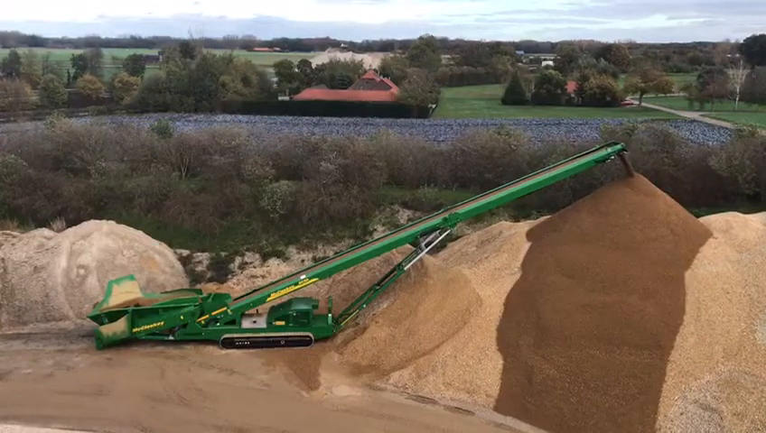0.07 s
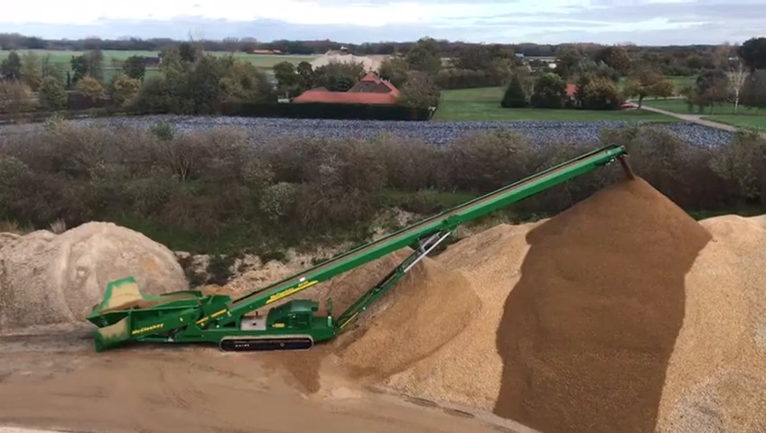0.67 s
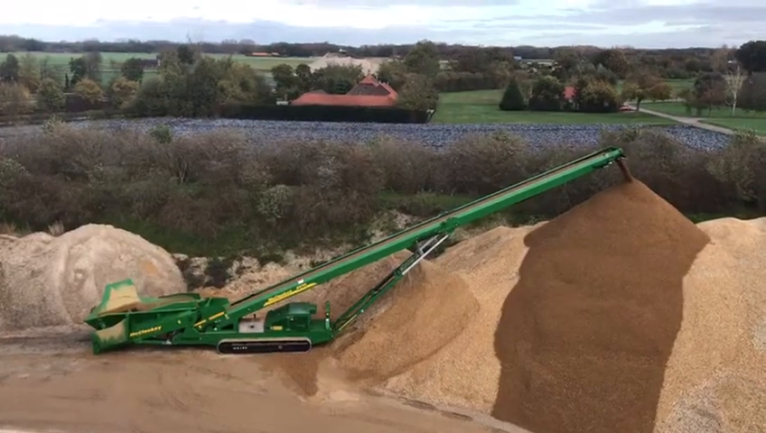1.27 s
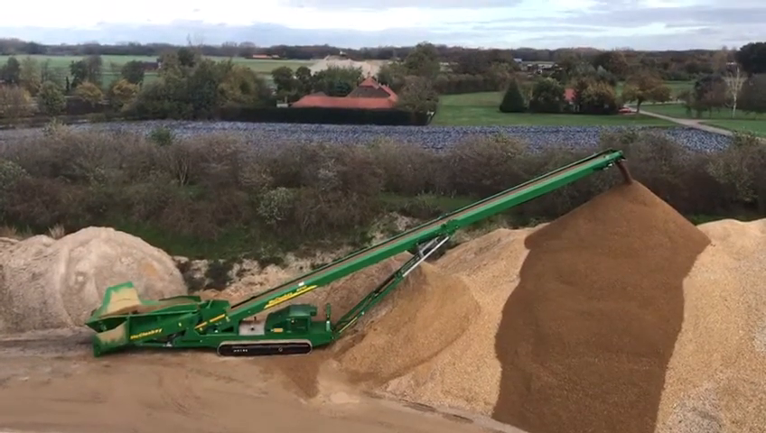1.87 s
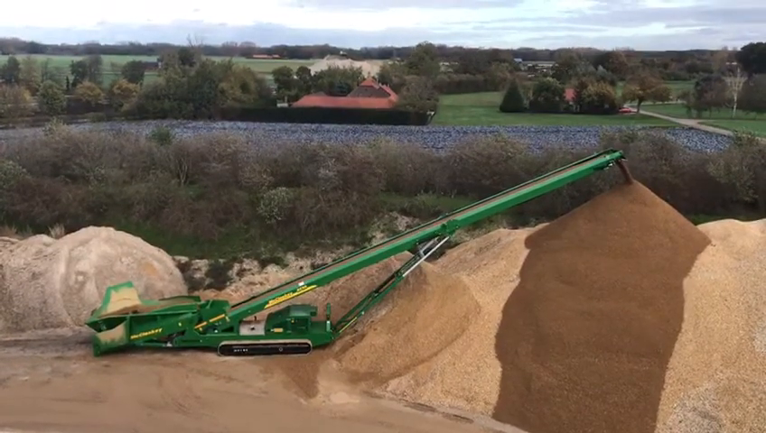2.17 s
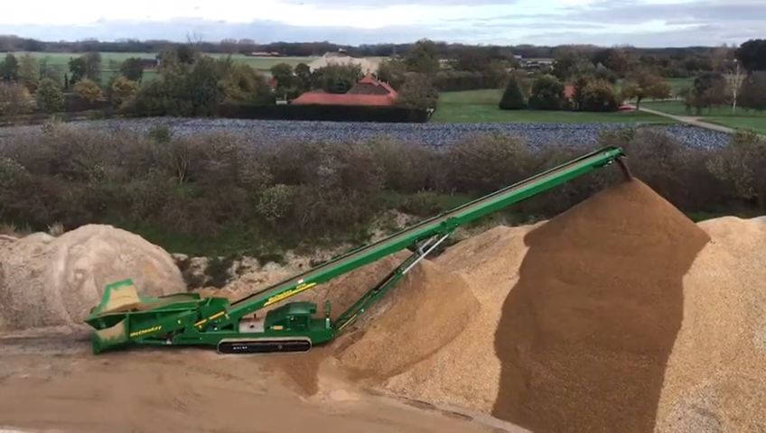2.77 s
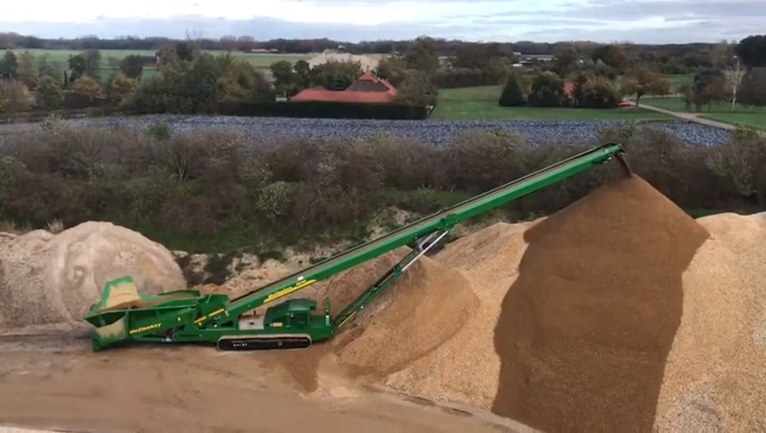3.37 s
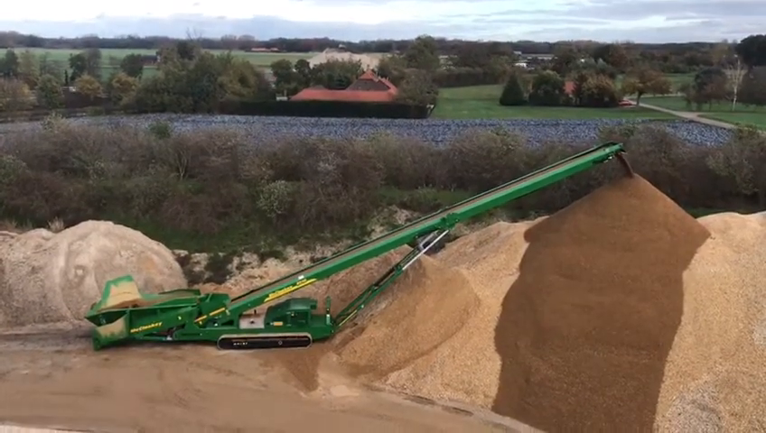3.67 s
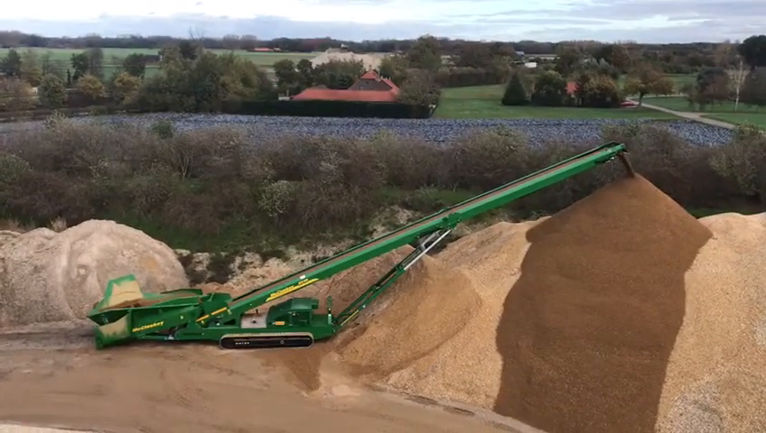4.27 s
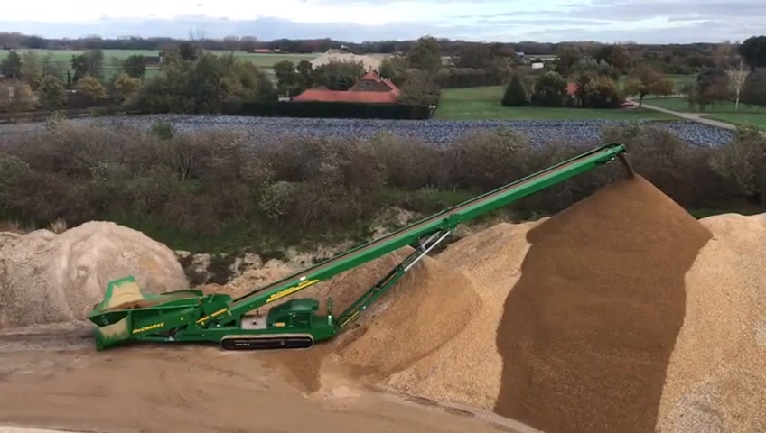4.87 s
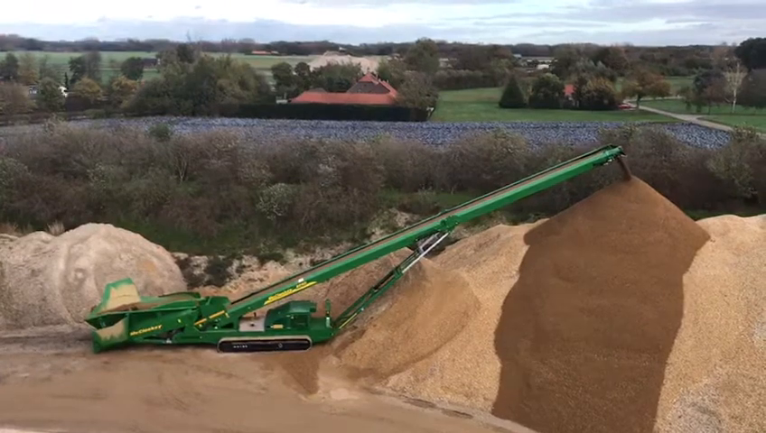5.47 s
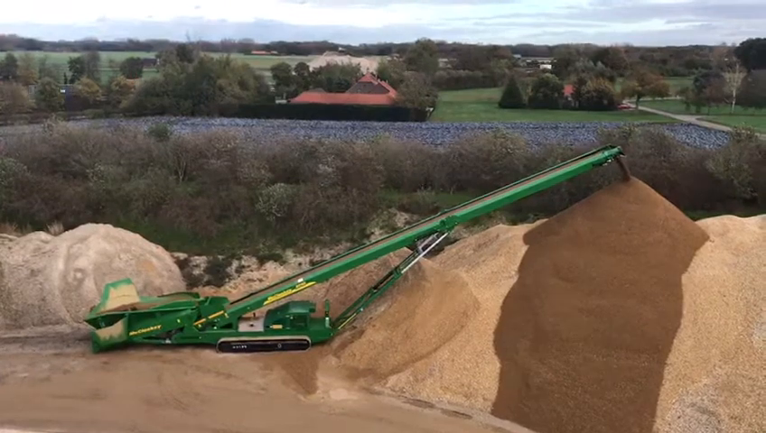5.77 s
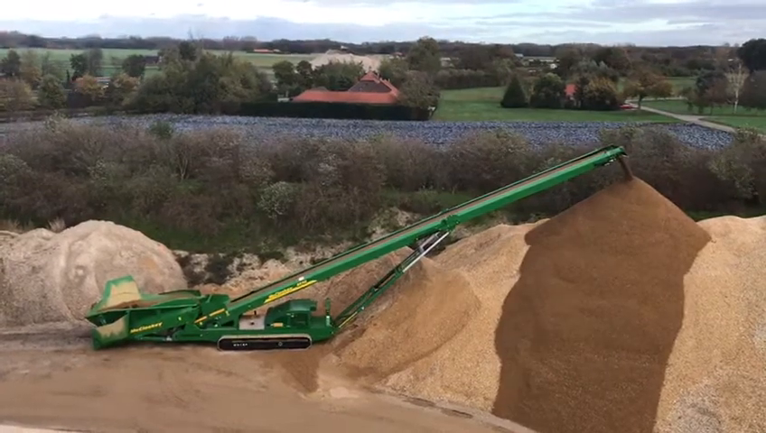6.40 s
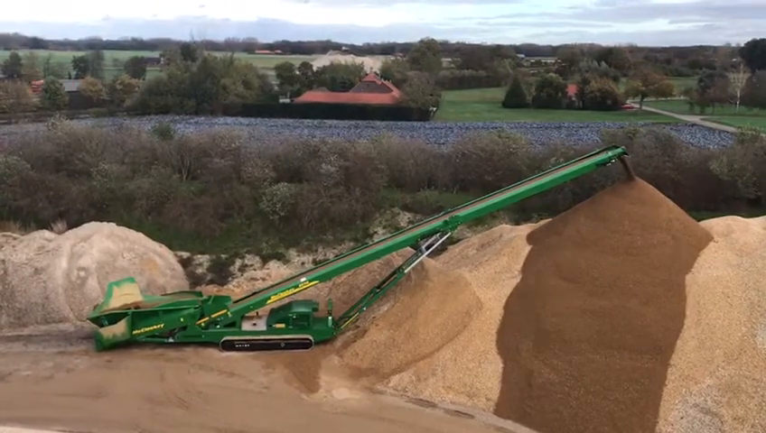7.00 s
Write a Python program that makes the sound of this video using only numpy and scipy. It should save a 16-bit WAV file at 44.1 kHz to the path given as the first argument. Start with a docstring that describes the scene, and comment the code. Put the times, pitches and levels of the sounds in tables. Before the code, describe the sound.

A large tracked conveyor runs some way off in an open yard. Its diesel engine makes a steady low rumble, with a wavering hydraulic hum, continuous metallic clatter and a faint hiss of sand on the belt. From about three seconds in, wind gusts buffet the microphone with low rumbles and soft thumps, strongest near six seconds. Two small pebble ticks sound midway while the machine carries on unchanged.

```python
"""A diesel roars through its housing, some way off: a tracked stacker conveyor works in an open yard.
Its hydraulic pump hums and whines at harmonics of the governed shaft, metal clatters, sand hisses
along the shaking belt, and two pebbles tick. In the second half, gusts buffet the microphone with a
low rumble and flutter across its port."""
import sys
import numpy as np
from scipy.fft import rfft, irfft, next_fast_len
from scipy.io import wavfile
from scipy.ndimage import map_coordinates

SR = 44100
rng = np.random.default_rng(int(sys.argv[2]) if len(sys.argv) > 2 else 0)


def wrap_up_sound(samples):
    """Save the sound to the file named by the first command line argument, as 16-bit audio."""
    columns = np.atleast_2d(samples).T
    # keep every value between -1 and 1, then stretch to whole-number steps
    tamed = np.clip(columns, -1, 1)
    steps = np.round(tamed * 32767).astype(np.int16)
    wavfile.write(sys.argv[1], SR, steps)


N = 319284


def amp(db):
    """Amplitude ratio of a level in decibels."""
    return 10 ** (np.asarray(db) / 20)


def unit(x):
    """Normalisation to rms 1."""
    return x / np.sqrt(np.mean(x ** 2) + 1e-20)


def clock():
    """The time of each sample in seconds."""
    return np.arange(N) / SR


def curve(rows):
    """Linear interpolation of (time, value) rows at each sample."""
    return np.interp(clock(), *np.transpose(rows))


def swell(s, half_s):
    """A Gaussian envelope: 1 at time s, 1/e at half_s to either side."""
    return np.exp(-((clock() - s) / half_s) ** 2)


def swells(rows):
    """A sum of Gaussian envelopes, one for each (time, dB, half length) row."""
    return sum(amp(db) * swell(s, half_s) for s, db, half_s in rows)


def bursts(events, t60):
    """Exponential decay from each (time, dB) event, by 60 dB in t60 seconds."""
    t = clock()
    return sum((t >= s) * amp(db - 60 * np.abs(t - s) / t60) for s, db in events)


def wobble(rate):
    """Smooth random modulation with rate knots a second."""
    knots = rng.standard_normal(int(N * rate / SR) + 4)
    return map_coordinates(knots, [clock() * rate], mode="nearest")


def filtered(x, response):
    """Filtering as multiplication of the spectrum by a response."""
    size = next_fast_len(N + SR // 2)
    return irfft(rfft(x, size) * response(np.fft.rfftfreq(size, 1 / SR)), size)[:N]


def coloured(x, points):
    """Spectral shaping by (Hz, dB) points joined on a log frequency axis."""
    hz_points, db = np.transpose(points)
    return filtered(x, lambda hz: amp(np.interp(np.log(hz + 1), np.log(hz_points), db)))


def noise(points):
    """Gaussian noise of rms 1 with the given spectrum."""
    return unit(coloured(rng.standard_normal(N), points))


def tone(cycles, db, waver_db, drift_rad):
    """Propagation through moving air modulates a tone's level and phase."""
    gain = amp(waver_db * wobble(5.5))
    phase = 2 * np.pi * cycles + drift_rad * wobble(4)
    return amp(db) * unit(gain * np.sin(phase))


# Engine noise behind the panels. Each row: frequency in Hz, relative spectral level in dB.
ROAR_SPECTRUM = [(15, -55), (25, -16), (36, -7), (54, 0.5), (70, 2), (91, -4.5), (189, -5.5), (217, -3),
                 (269, -7), (295, -5.5), (356, -6), (469, -9), (570, -3.5), (650, -5.5), (793, -15.5),
                 (1000, -20.5), (1300, -31.5), (2200, -120)]

def engine_roar(level_db=-26, lumpiness=0.073, sway_db=-0.23):
    """Transmission through the housing smears the firings into a low, lumpy noise."""
    firings = rng.standard_normal(N) * np.exp(lumpiness * wobble(160))
    sway = amp(sway_db * wobble(2.96) + 0.65 * wobble(13))
    return amp(level_db) * unit(coloured(firings, ROAR_SPECTRUM) * sway)


# The diesel's line spectrum. Each row: multiple of the shaft speed, level in dB.
ENGINE_ORDERS = [(2, -42.5), (2.5, -45), (4, -45), (5.5, -48.5), (6, -43.5), (8, -52), (15, -48.5)]

def engine_hum(turns):
    """Periodic firing radiates tones at whole and half orders of the shaft speed."""
    return sum(tone(order * turns, db, waver_db=2.0, drift_rad=0.35) for order, db in ENGINE_ORDERS)


# A panel's resonance. Each row: frequency in Hz, relative spectral level in dB.
PANEL_SPECTRUM = [(570, -35), (635, -1), (700, 4), (770, -31), (1000, -80)]
# Its swells. Each row: peak time in seconds, level in dB, half length in seconds.
PANEL_SWELLS = [(.87, -36, 0.086), (1.23, -34.5, 0.083), (3.55, -37.5, 0.068), (3.82, -38, .11),
                (5.58, -34.5, 0.068), (5.94, -36, 0.08), (6.21, -34.5, .13)]

def housing_panel():
    """Resonance of a housing panel favours a narrow band, which swells and sinks back."""
    return swells(PANEL_SWELLS) * noise(PANEL_SPECTRUM)


# The pump's fundamental. Each row: time in seconds, level in dB.
PUMP_FUNDAMENTAL_LEVEL = [(0, -37.5), (1.1, -38.5), (2.0, -39), (2.3, -32), (2.65, -39.5), (3.0, -35),
                          (3.8, -44), (4.5, -38), (5.2, -40.5), (6.3, -34.5), (6.7, -47.5), (7.05, -37.5)]
# Its second harmonic. Each row: time in seconds, level in dB.
PUMP_OCTAVE_LEVEL = [(0, -50), (.45, -39), (.9, -36), (1.2, -40), (1.75, -39), (2.05, -37), (2.7, -44),
                     (3.0, -59), (3.6, -49), (4.25, -36), (4.65, -51), (5.4, -38.5), (5.65, -47),
                     (6.0, -35.5), (6.55, -39.5), (7.2, -37)]
# Its weaker overtones. Each row: multiple of the shaft speed, level in dB.
PUMP_OVERTONES = [(40, -67), (50, -62)]

def pump_hum(turns, strokes_per_turn=10):
    """Periodic pump strokes radiate harmonics, which fade and return through the air."""
    strokes = strokes_per_turn * turns
    fundamental = tone(strokes, curve(PUMP_FUNDAMENTAL_LEVEL), waver_db=2.1, drift_rad=0.17)
    octave = tone(2 * strokes, curve(PUMP_OCTAVE_LEVEL), waver_db=1.5, drift_rad=0.05)
    overtones = sum(tone(order * turns, db, waver_db=3.0, drift_rad=0.1) for order, db in PUMP_OVERTONES)
    return fundamental + octave + overtones


# The whine's lower and upper tone. Each row: resting level in dB, rise in dB at swell strength 1.
WHINE_LEVELS = [(-78, 11.5), (-84, 12.5)]
# Their swells. Each row: peak time in seconds, half length in seconds, strength of the lower tone,
# strength of the upper tone.
WHINE_SWELLS = [(0.5, 0.27, 1.05, .2), (0.88, .09, 1.0, .5), (1.2, 0.22, .8, .5), (1.68, .19, .62, 0),
                (2.3, .22, .95, .2), (2.67, 0.16, 1.2, .35), (4.12, .19, .92, .2), (4.72, .22, 0, 1.0),
                (4.97, .2, 1.05, .5), (5.24, .08, .8, 0), (6.2, .2, .7, .3), (6.86, .08, .85, 0)]

def pump_whine(turns, orders=(150, 200)):
    """Two high pump harmonics swell out of the masking hiss and sink back."""
    rises = sum(np.outer(strengths, swell(s, half_s)) for s, half_s, *strengths in WHINE_SWELLS)
    return sum(amp(rise_db * rise) * tone(order * turns, db, waver_db=1.0, drift_rad=0.2)
               for order, (db, rise_db), rise in zip(orders, WHINE_LEVELS, rises))


# Clattering metal. Each row: frequency in Hz, relative spectral level in dB.
CLATTER_SPECTRUM = [(470, -38), (800, -12), (880, -3), (954, -2), (1110, 0.5), (1290, -4), (1460, -6.5),
                    (1570, -10), (1780, -9.5), (2120, -15.5), (2550, -14.5), (3120, -15.5), (4310, -28),
                    (4600, -35), (5980, -57), (10100, -120)]
# Its envelope. Each row: time in seconds, level in dB.
CLATTER_ENVELOPE = [(0.1, -41), (0.85, -40), (1.85, -41), (2.3, -41.5), (2.75, -40.5), (3.5, -41.5),
                    (4.2, -40.5), (5.35, -40), (5.9, -41), (6.5, -41), (6.9, -40)]

def metal_clatter(grit=0.053):
    """Dense metal impacts superpose into continuous noise."""
    impacts = rng.standard_normal(N) * np.exp(grit * wobble(500))
    clatter = unit(coloured(impacts, CLATTER_SPECTRUM) * amp(0.11 * wobble(9.7)))
    return amp(curve(CLATTER_ENVELOPE)) * clatter


# Tones of the belt drives and rollers. Each row: frequency in Hz, level in dB.
DRIVE_TONES = [(213.5, -41), (224.5, -45), (1222.5, -80), (1643.5, -63.5)]

def belt_drives():
    """Parts rotating at their own speeds radiate tones independent of the engine shaft."""
    return sum(tone(hz * clock(), db, waver_db=1.0, drift_rad=0.96) for hz, db in DRIVE_TONES)


# Gusts. Each row: peak time in seconds, level in dB before the low cut, half length in seconds.
WIND_GUSTS = [(2.916, -27, 0.052), (3.096, -25, 0.05), (3.5, -19.8, 0.14), (3.85, -22, 0.061),
              (4.285, -23.5, 0.12), (4.7, -28, .04), (5.3, -26, 0.05), (5.488, -20.5, .02),
              (5.666, -20, 0.069), (5.93, -18.5, 0.18), (6.213, -21.5, 0.11), (6.377, -26, 0.19),
              (6.906, -21, 0.086), (7.24, -20, .06)]
# Their rumble. Each row: frequency in Hz, relative spectral level in dB before saturation.
RUMBLE_SPECTRUM = [(16, -34), (28, -8.5), (43, -2.5), (52, 1.5), (62, -1), (80, -5), (115, -10.5),
                   (145, -17.5), (170, -19), (230, -30.5), (400, -50), (800, -120)]
# Eddies that thump the diaphragm. Each row: time in seconds, peak level in dB before the low cut.
EDDY_THUMPS = [(2.905, -22), (3.128, -15), (3.435, -22), (3.555, -13), (3.8, -16), (3.875, -16), (4.70, -9),
               (5.25, -13.5), (5.645, -13), (5.68, -18), (5.85, -16), (5.915, -13), (6.0, -15),
               (6.915, -10)]
# Turbulence in strong gusts. Each row: frequency in Hz, relative spectral level in dB.
RUSTLE_SPECTRUM = [(400, -4), (800, 7), (1200, -1), (1800, -22), (3000, -29), (6000, -44)]

def wind(breeze_db=-29.5, breeze_from_s=2.7, breeze_rise_s=0.58, port_drive=0.7,
         eddy_hz=53, eddy_half_s=0.012, low_cut_hz=30, rustle_db=-49, rustle_power=1.8):
    """Turbulent pressure on the microphone rumbles, thumps and, in strong gusts, rustles."""
    t = clock()
    breeze = amp(breeze_db) * np.clip((t - breeze_from_s) / breeze_rise_s, 0, 1)
    gust_power = sum((amp(db) * swell(s, half_s)) ** 2 for s, db, half_s in WIND_GUSTS)
    strength = np.sqrt(breeze ** 2 + gust_power)
    thumps = sum(amp(db) * swell(s, eddy_half_s) * np.sin(2 * np.pi * (eddy_hz * t + rng.random()))
                 for s, db in EDDY_THUMPS)
    # The port saturates, which keeps the rumble rough and unbroken.
    rumble = strength * unit(np.tanh(port_drive * noise(RUMBLE_SPECTRUM)))
    buffeting = filtered(rumble + thumps, lambda hz: 1 - 1 / (1 + (hz / low_cut_hz) ** 6))
    # The rustle grows faster than the rumble and comes in ragged puffs.
    puffs = amp(3 * wobble(70))
    rustle = amp(rustle_db) * unit(strength ** rustle_power * puffs * noise(RUSTLE_SPECTRUM))
    return buffeting + rustle


# Puffs of air. Each row: peak time in seconds, flutter level in dB, half length in seconds,
# rasp level in dB.
PORT_PUFFS = [(3.725, -33, .004, -58), (3.789, -28.5, .008, -52), (3.813, -28, .0045, -53),
              (5.592, -34.5, 0.023, -45), (5.867, -32, .004, -54), (5.897, -31.5, .003, -52),
              (5.939, -30.5, 0.0046, -56), (5.981, -30, .005, -48), (6.008, -25.5, 0.0035, -44),
              (6.05, -36, .008, -45), (6.066, -31, .004, -50), (6.168, -27, 0.0076, -47),
              (6.191, -34, .004, -39.5), (6.202, -34, .02, -52), (6.29, -38, .04, -61),
              (6.39, -35, .008, -56)]
# A puff's flutter. Each row: frequency in Hz, relative spectral level in dB.
FLUTTER_SPECTRUM = [(350, -18), (700, 3), (1000, 9), (1300, 3.5), (1600, -8.5), (2100, -19), (3200, -42),
                    (6000, -120)]
# The rasp above it. Each row: frequency in Hz, relative spectral level in dB.
RASP_SPECTRUM = [(1000, -15), (1700, 5.5), (2600, -2), (3400, -8), (4500, -24), (9000, -120)]

def port_flutter(ragged_db=-0.5):
    """Unsteady flow across the microphone port flutters; faster puffs rasp as well."""
    flutter = sum(amp(db) * swell(s, half_s) for s, db, half_s, _ in PORT_PUFFS)
    rasp = sum(amp(db) * swell(s, half_s) for s, _, half_s, db in PORT_PUFFS)
    raggedness = unit(amp(ragged_db * wobble(180)))
    return raggedness * (flutter * noise(FLUTTER_SPECTRUM) + rasp * noise(RASP_SPECTRUM))


# Sliding sand. Each row: frequency in Hz, relative spectral level in dB.
SAND_SPECTRUM = [(2710, -16), (4600, -2.5), (4850, -5), (5620, 0.5), (7300, -7.5), (7970, -3.5), (8430, -3),
                 (10300, -9), (11200, -8.5), (11600, -12), (12000, -20), (15600, -47), (22000, -120)]
# Its flow along the belt. Each row: time in seconds, relative level in dB.
SAND_FLOW = [(0, 1), (1.45, 1), (2.1, 1), (2.35, 2.5), (2.8, 1.5), (3.55, -1), (3.9, -0.5), (4.15, 2),
             (4.75, 1.4), (5.0, -0.2), (5.3, 2), (5.8, -1), (6.2, 1), (7.15, 1)]
# Spills of fine sand. Each row: peak time in seconds, level in dB, half length in seconds.
SAND_SPILLS = [(2.789, -59, .009), (2.832, -58, .036), (3.09, -65, .02), (6.27, -65, 0.18)]
# Their spray. Each row: frequency in Hz, relative spectral level in dB.
SPRAY_SPECTRUM = [(6500, -40), (8000, 4), (11500, -3), (13000, -30)]

def sand(level_db=-59, grit=0.099, shake_hz=15.6, shake_s=2.452, shake_half_s=0.25, shake_depth=0.23):
    """Friction of sliding grains hisses, modulated by one spell of hard shaking; fine spills spray off."""
    belt_motion = np.cos(2 * np.pi * shake_hz * (clock() - shake_s))
    shaking = 1 + shake_depth * swell(shake_s, shake_half_s) * belt_motion
    grains = rng.standard_normal(N) * np.exp(grit * wobble(900))
    flow = amp(curve(SAND_FLOW) + 0.64 * wobble(18))
    hiss = amp(level_db) * unit(coloured(grains, SAND_SPECTRUM) * shaking * flow)
    return hiss + swells(SAND_SPILLS) * noise(SPRAY_SPECTRUM)


# Pebble impacts. Each row: start in seconds, relative level in dB.
PEBBLE_TICKS = [(3.3545, -21), (4.596, -29)]
# The colour of a tick. Each row: frequency in Hz, gain in dB.
PEBBLE_SPECTRUM = [(900, -20), (1700, 2.5), (2600, 2), (3600, -4.5), (4500, -6.5), (5800, -17), (7000, -38)]

def pebbles(knock_hz=2100, knock_t60_s=0.008, knock_db=-7):
    """A heavily damped impact hardly rings: one pulse, a dull knock and a faint chip of noise."""
    pulses = amp(8) * coloured(bursts(PEBBLE_TICKS, t60=0.0004), PEBBLE_SPECTRUM)
    knocks = sum(bursts([(s, db + knock_db)], knock_t60_s) * np.sin(2 * np.pi * knock_hz * (clock() - s))
                 for s, db in PEBBLE_TICKS)
    chips = amp(-20) * bursts(PEBBLE_TICKS, t60=0.011) * noise(PEBBLE_SPECTRUM)
    return pulses + knocks + chips


# Rattling rollers. Each row: frequency in Hz, relative spectral level in dB.
ROLLER_SPECTRUM = [(1300, -30), (2100, -3), (3100, 1), (3900, -11), (5500, -32)]
# Their spells. Each row: peak time in seconds, level in dB, half length in seconds.
ROLLER_SPELLS = [(.55, -58, 0.17), (0.922, -53.5, 0.17), (2.52, -53.5, 0.15), (2.78, -53, .08),
                 (5.2, -55, .08), (6.9, -59, 0.13)]

def rollers(grit=0.25):
    """The belt's rollers rattle in short, bright spells; fast amplitude modulation makes them rough."""
    return swells(ROLLER_SPELLS) * unit(noise(ROLLER_SPECTRUM) * np.exp(grit * wobble(300)))


def scene(shaft_hz=30.02):
    """Superposition of machine, load and wind; the governor holds the shaft speed almost steady."""
    turns = np.cumsum(shaft_hz * (1 + 0.0002 * wobble(2))) / SR
    tones = engine_hum(turns) + pump_hum(turns) + belt_drives() + pump_whine(turns)
    machine_noise = engine_roar() + metal_clatter() + housing_panel() + rollers()
    return (tones + machine_noise + sand() + pebbles() + wind() + port_flutter())[None]


def record(dry):
    """Band limiting: a steep low-pass filter removes the highest treble."""
    cutoff_hz = 11900
    return filtered(dry[0], lambda hz: 1 / np.sqrt(1 + (hz / cutoff_hz) ** 160))[None]


dry = scene()
out = record(dry)
wrap_up_sound(out)
```